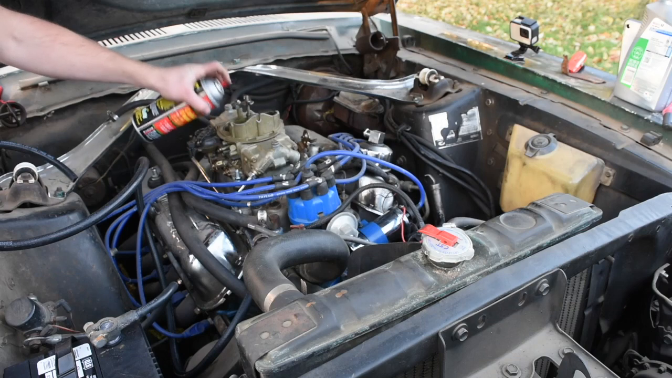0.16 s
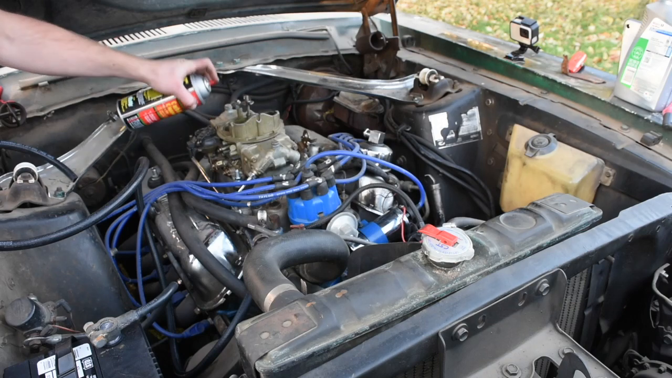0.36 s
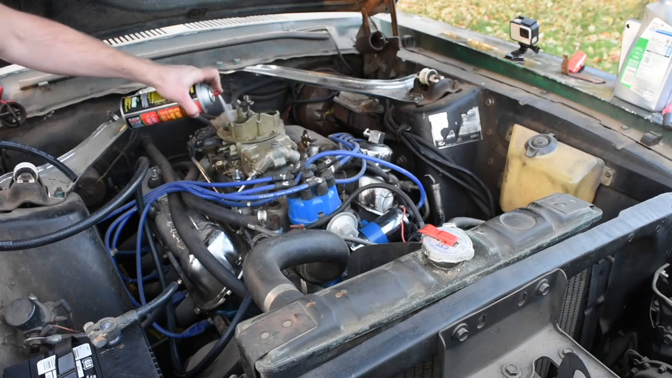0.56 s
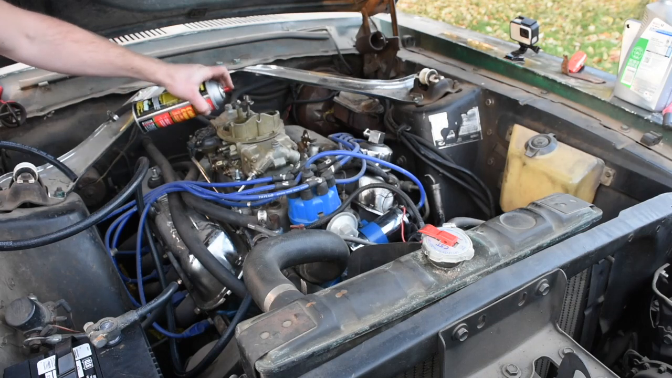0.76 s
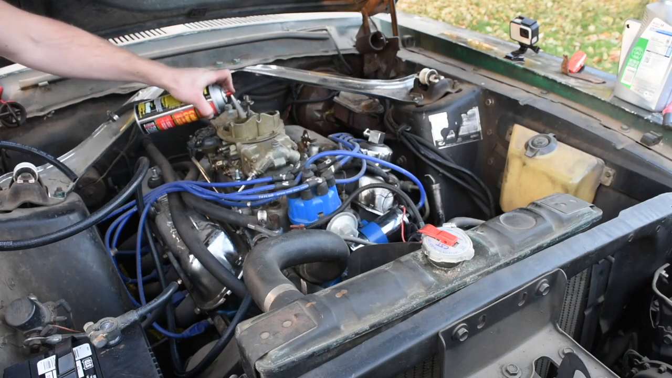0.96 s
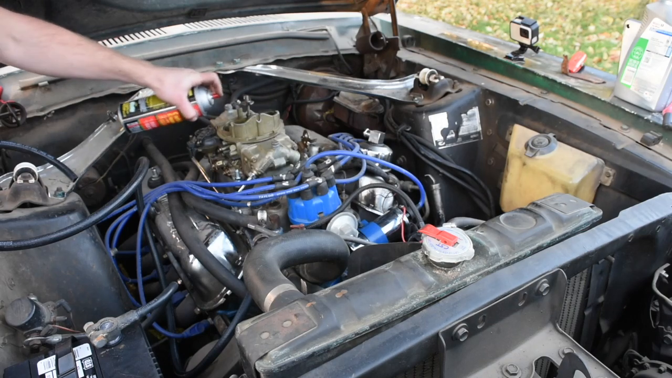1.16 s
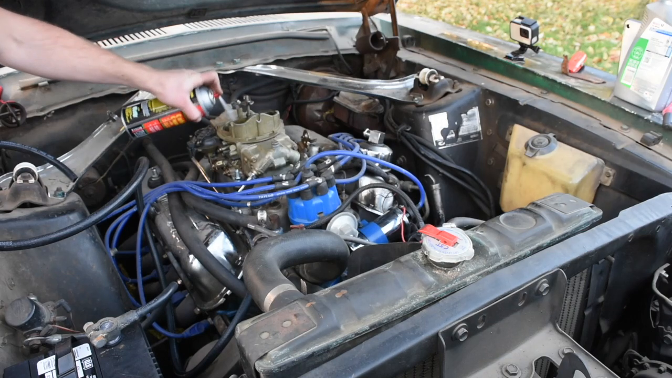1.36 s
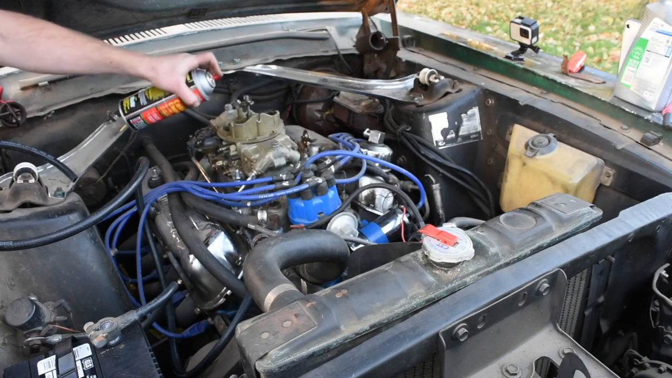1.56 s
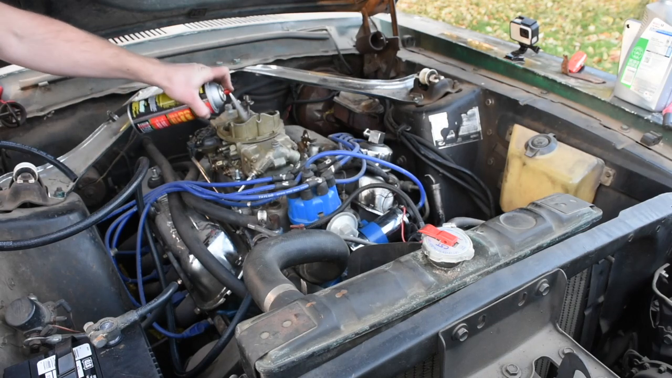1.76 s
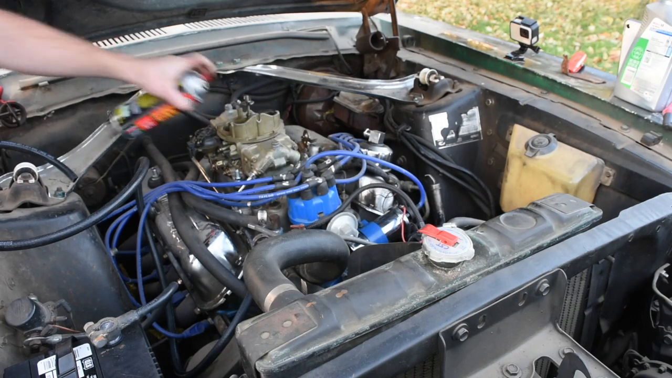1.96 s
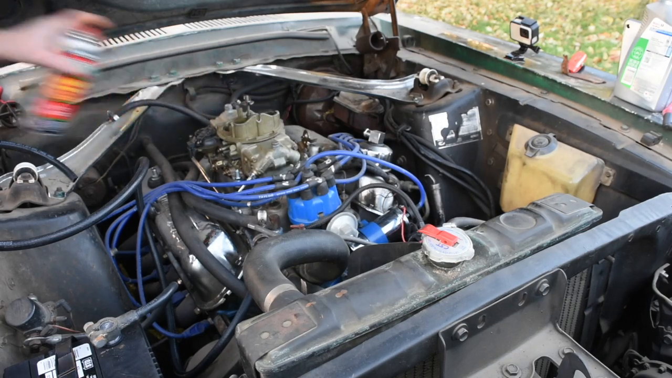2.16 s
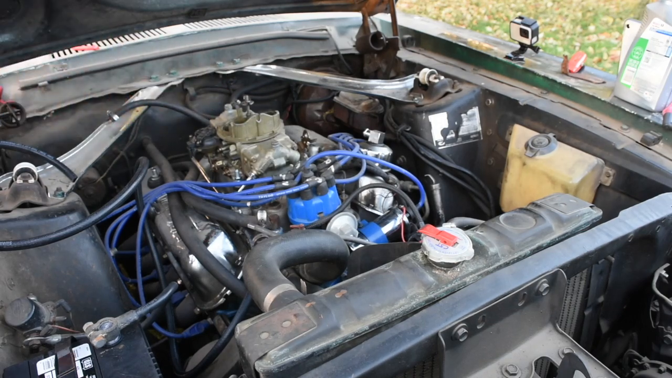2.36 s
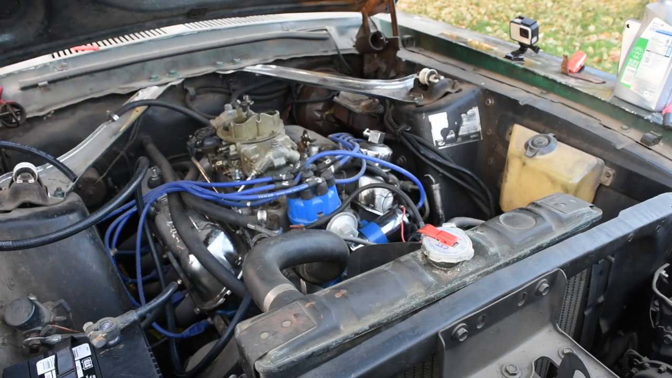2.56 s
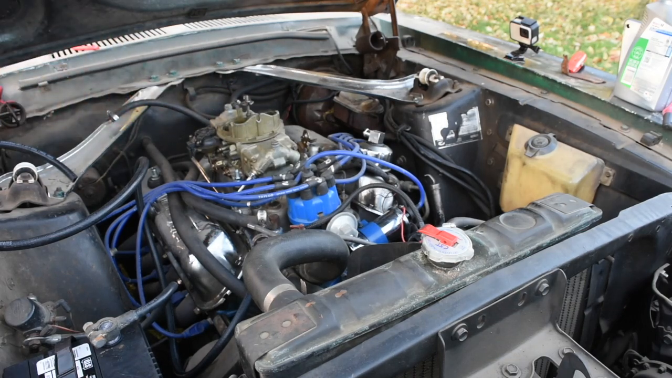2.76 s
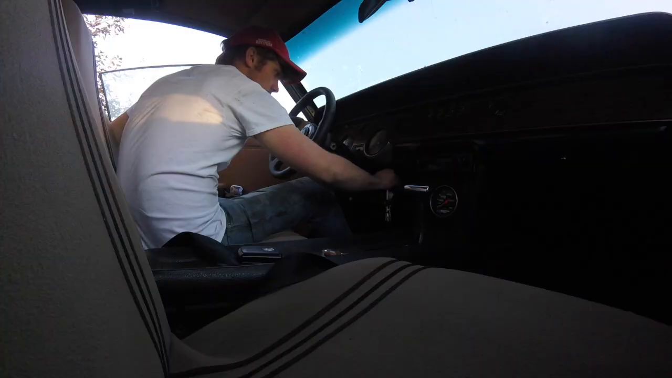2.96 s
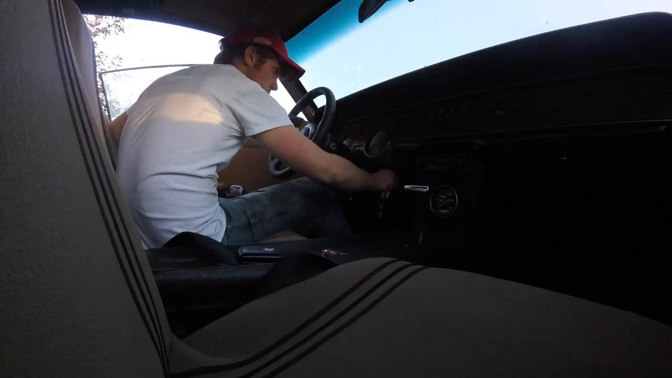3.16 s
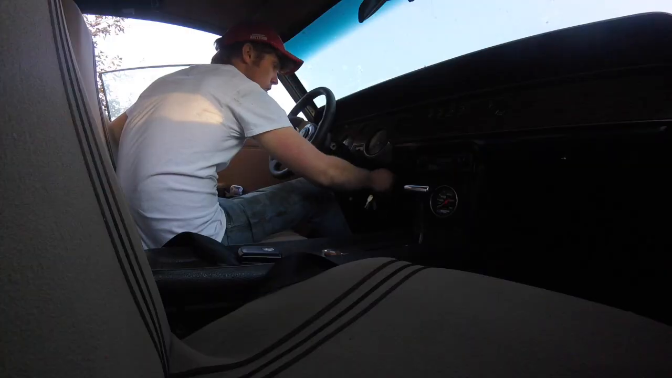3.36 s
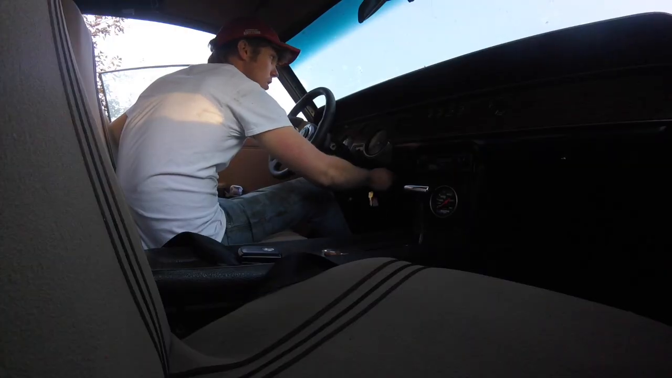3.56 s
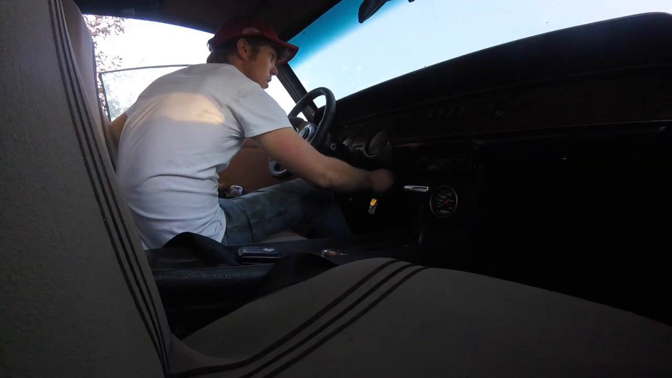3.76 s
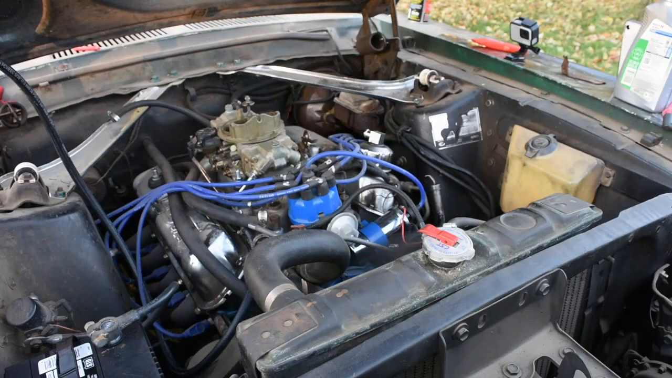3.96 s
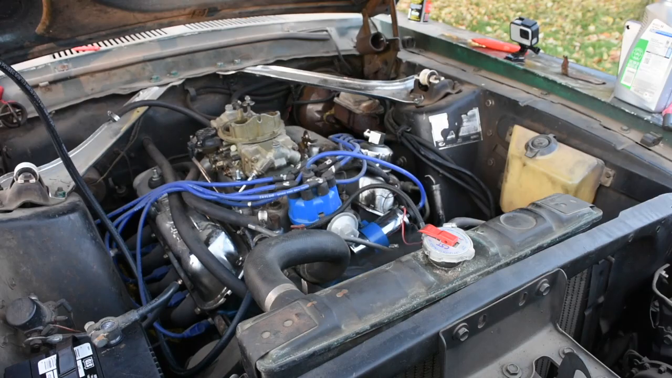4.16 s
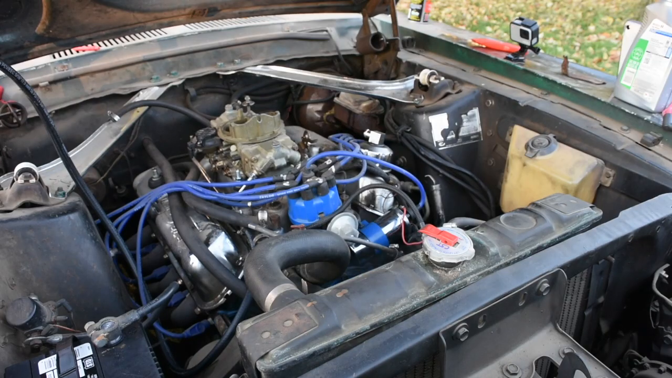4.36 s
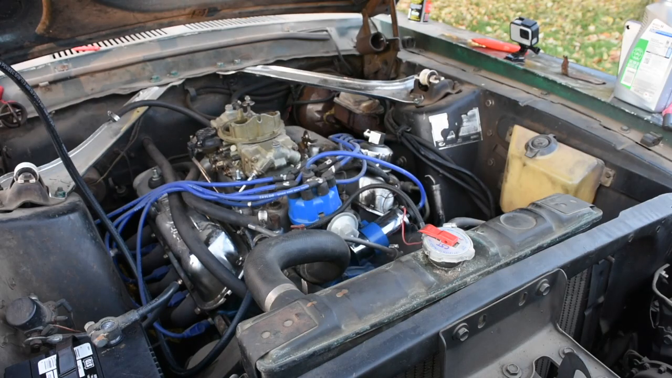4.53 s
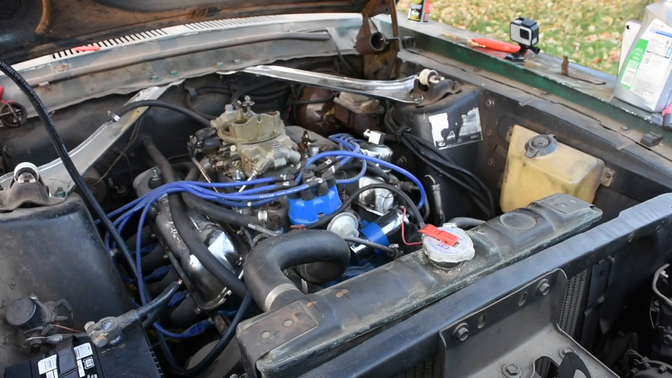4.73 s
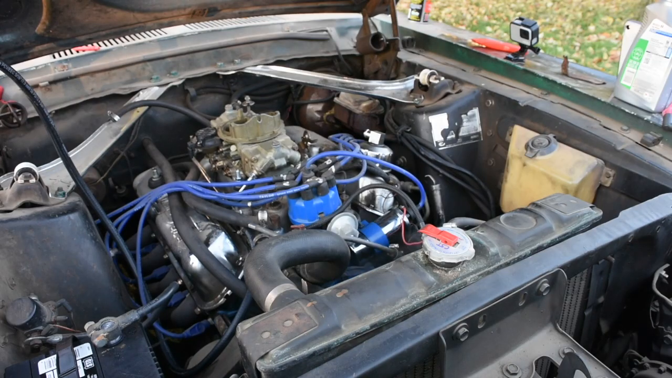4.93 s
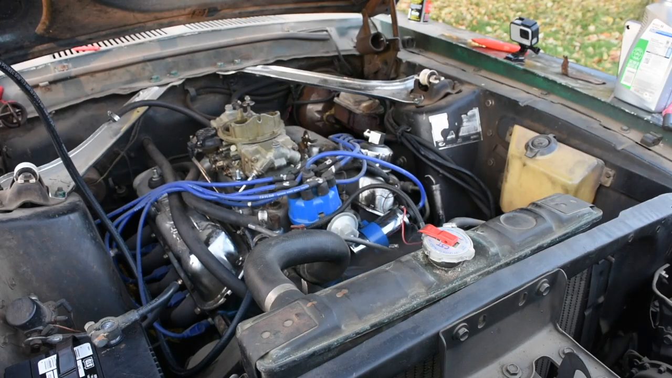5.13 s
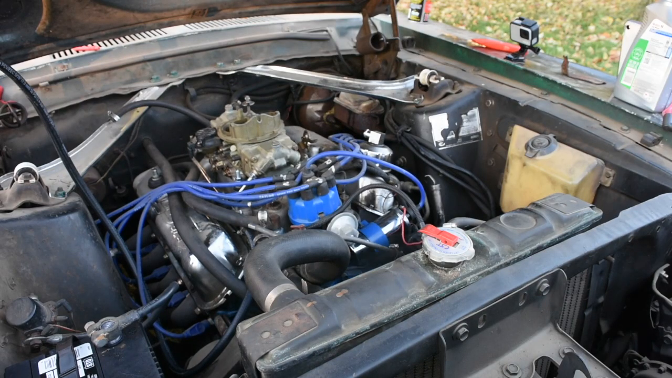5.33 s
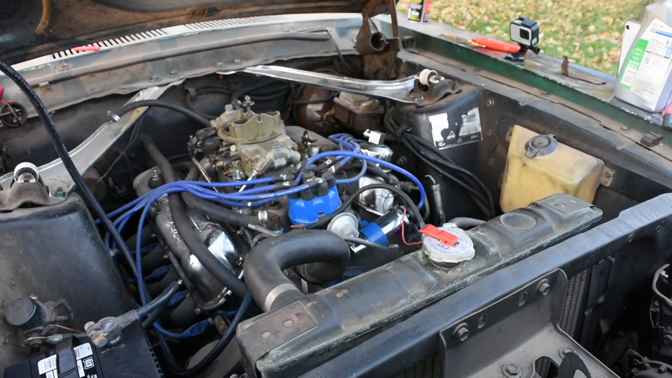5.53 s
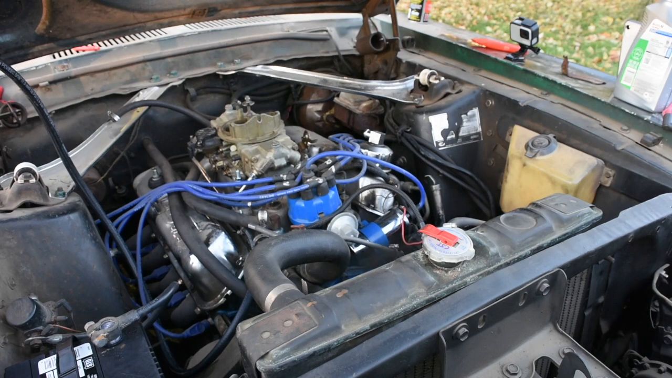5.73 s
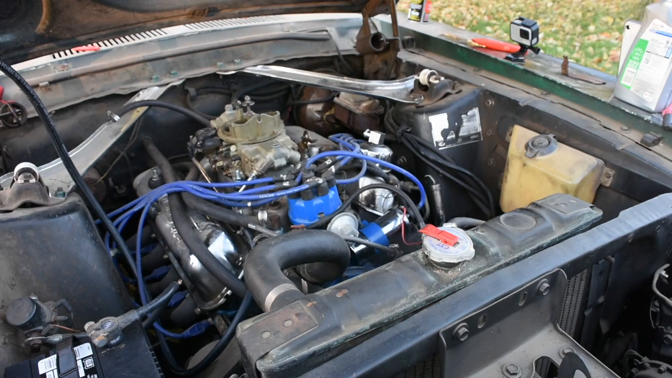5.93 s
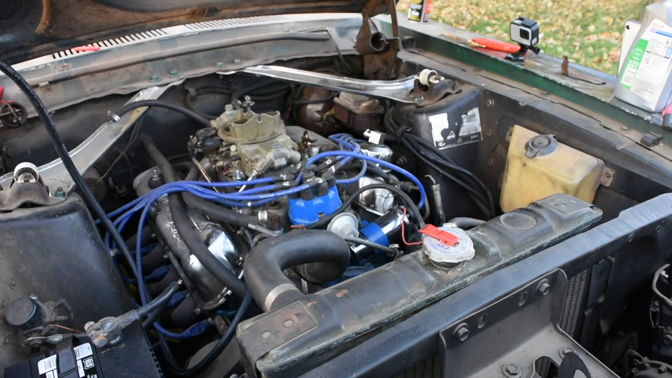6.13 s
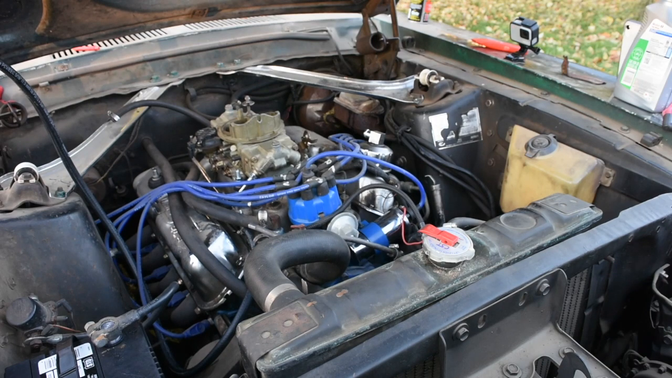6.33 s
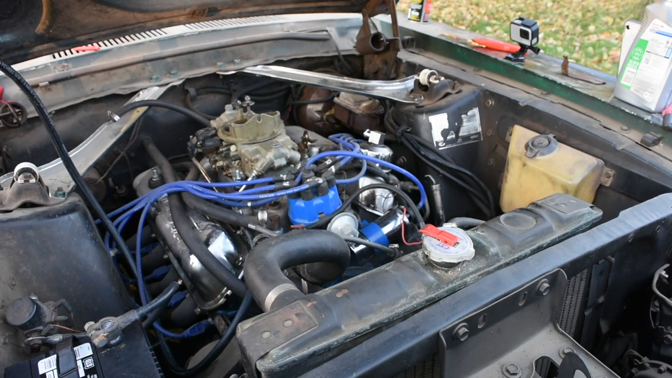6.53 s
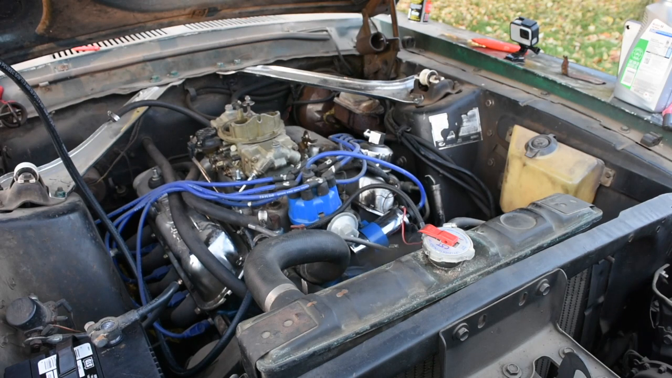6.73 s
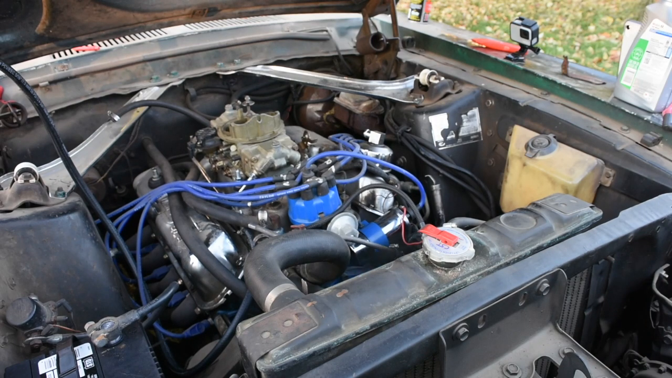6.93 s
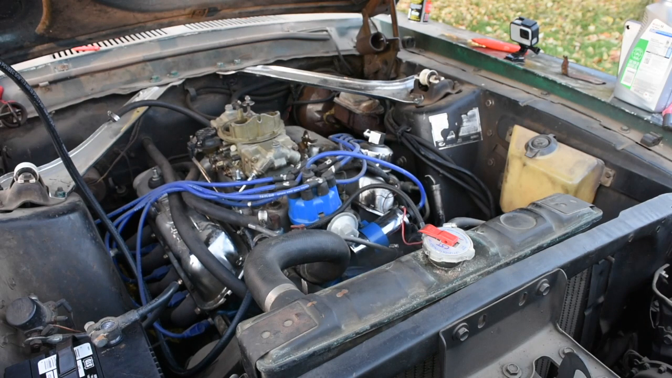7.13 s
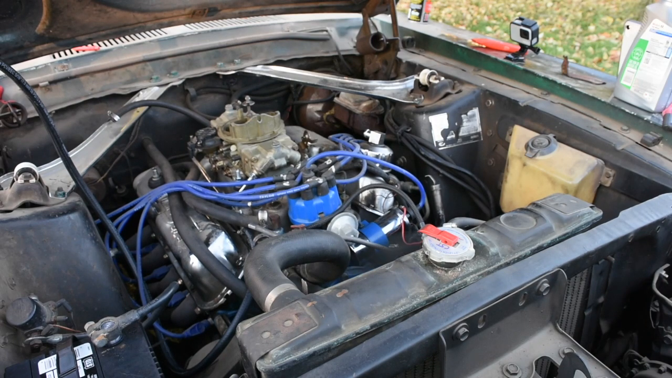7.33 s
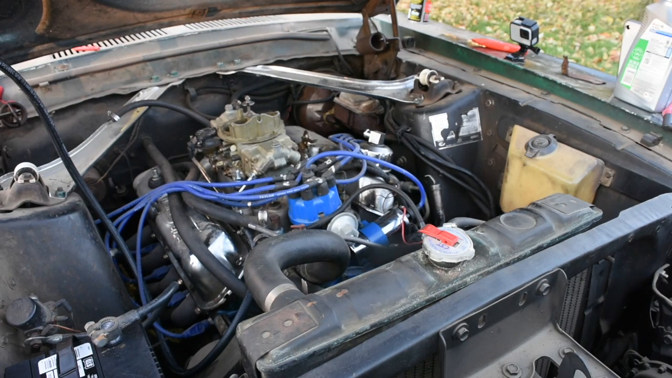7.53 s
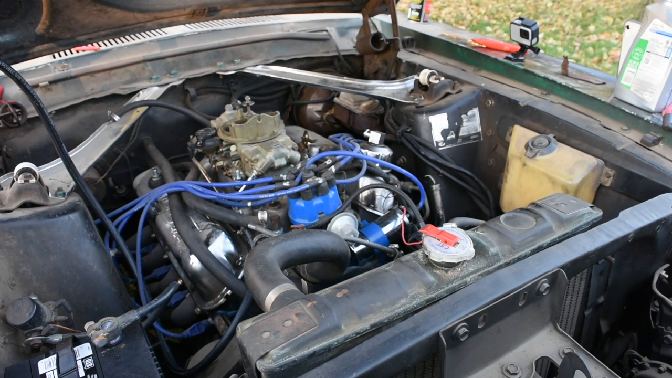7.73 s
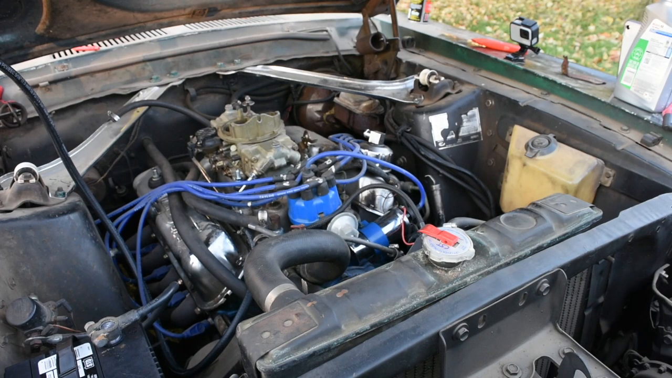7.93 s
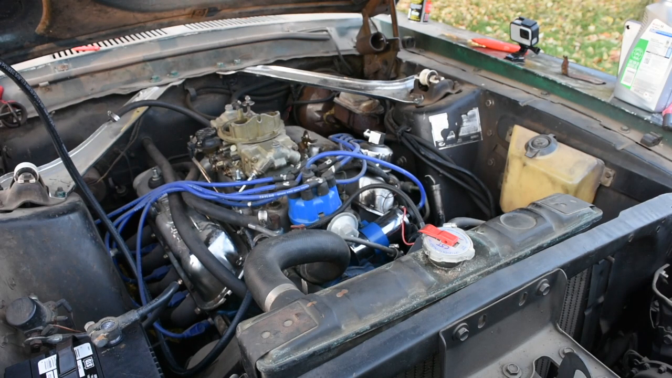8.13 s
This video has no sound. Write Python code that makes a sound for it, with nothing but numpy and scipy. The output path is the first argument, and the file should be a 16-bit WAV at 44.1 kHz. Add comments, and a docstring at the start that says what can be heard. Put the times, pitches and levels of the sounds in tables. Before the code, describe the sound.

Quiet outdoor yard noise sits underneath. From 0 to about 1.9 seconds, five short, bright aerosol squirts hiss close by, beginning near 0, 0.55, 0.95, 1.35 and 1.75, each opening sharply, with a slight sputter and a faint hollow hoot from the carburetor throat. Light taps ring the can between squirts and around 2.1 to 2.3. At 2.8 a car door slams with a low, boxy boom of panels and air, stopping abruptly near 2.95; a very weak hum follows. At 3.4 hard metallic clanks and a hollow thud engage the starter. It cranks loudly until 7.6, a gritty gear whine with grinding, rattle and deep body shake, surging roughly thirteen times a second with compression strokes, slightly tiring, never firing. It releases at 7.65, clunks at 7.7, coasts with thin high squeaks around 7.8, then clunks at 7.9 and clinks softly at 8.1.

```python
"""Over quiet yard noise, five squirts of a spray can hiss into a hooting carburettor throat; taps ring the can.
A door slams with a low boom of panels and air, and a weak hum follows. Then blows ring the iron and a starter
cranks a V8 that never catches: tooth tones, grind and rattle rise and fall with every compression stroke.
The starter lets go and coasts, thin whistles squeak as it runs down, and the last blows clunk and clink."""
import sys
import numpy as np
from scipy import signal
from scipy.fft import rfft, irfft, next_fast_len
from scipy.io import wavfile
from scipy.ndimage import uniform_filter1d, minimum_filter1d, map_coordinates

SR = 44100
rng = np.random.default_rng(int(sys.argv[2]) if len(sys.argv) > 2 else 0)


def store_pcm(level_fs):
    """Save levels as 16-bit WAV."""
    pcm = np.round(np.clip(level_fs, -1, 1) * 32767).astype(np.int16)
    wavfile.write(sys.argv[1], SR, np.atleast_2d(pcm).T)


def makeup_ratio(level_db):
    """Linear amplitude ratio for a level in decibels (20 dB per factor of ten)."""
    decades = np.asarray(level_db, float) / 20
    return 10 ** decades


N = 361179

# colour of the yard noise: pitch_hz, level_db
YARD_COLOUR = [(13, -39), (22, -10), (58, -3), (123, -3.5), (196, -15), (259, -15), (403, -19),
               (1700, -32.5), (2010, -32.5), (10300, -42), (15000, -48.5), (16500, -62.5)]
# loudness of the yard over time: time_s, level_db
YARD_LEVEL = [(0, -55), (2, -53), (2.4, -52.5), (2.9, -52.5), (3.3, -52.5), (7.9, -43), (8.19, -49)]
# faint hum in the cab: pitch_hz, level_db
HUM_TONES = [(258, -59), (1720, -78), (2170, -80)]
# the body shakes the microphone: time_s, level_db
SHUDDER_LEVEL = [(3.4, -37.5), (4, -39.5), (6, -42), (7.6, -45), (8.19, -68)]
# colour of that shaking: pitch_hz, level_db
SHUDDER_COLOUR = [(15, -26.5), (28, 1), (45, 1), (110, -1), (160, -40)]
# echoes of the engine bay: pitch_hz, level_db; then pitch_hz, time to fall 60 dB_s
BAY_COLOUR, BAY_FADE = [(100, -5), (16000, -6)], [(200, 1.0), (8000, 0.056)]

# door panels that ring: pitch_hz, level_db, time to fall 60 dB_s
DOOR_PANELS = [(106, 2, 0.34), (296, -21, 0.31), (880, -19, 0.35), (1100, -23, 0.2), (1240, -23, 0.17),
               (1660, -10, 0.14), (2230, -21, 0.19), (2385, -19, 0.16)]
# the air moved by the door: pitch_hz, level_db
DOOR_AIR_COLOUR = [(29, -24), (50, -1), (141, -6.5), (532, -17), (1210, -15), (2490, -20.5), (3030, -19),
                   (16000, -55)]
# how long that air sounds: pitch_hz, time to fall 60 dB_s
DOOR_AIR_FADE = [(100, 0.46), (1000, 0.22), (3000, 0.16), (10000, 0.046)]
DOOR_S, DOOR_END_S = 2.784, 2.942

# squirts: open_s, shut_s, jet_level_db, throat_hz, throat_level_db, seep before opening_s, jet_ring_hz
SQUIRTS = [(-.05, 0.2, -22.5, 804, -36.5, .01, 5290), (0.537, 0.723, -21.5, 908, -36, 0.0018, 4330),
           (0.937, 1.147, -22, 860, -36, 0.028, 4520), (1.366, 1.495, -21.5, 870, -35, 0.026, 4860),
           (1.764, 1.915, -22, 815, -38.5, 0.053, 4740)]
# colour of the jet: pitch_hz, level_db
JET_COLOUR = [(88, -59), (150, -21.5), (571, -12), (864, -11.5), (1440, -12), (4420, -6), (5930, -5.5),
              (14100, 1), (15600, -4), (16500, -36.5)]
# part of the jet that differs left to right: pitch_hz, level_db
JET_WIDTH = [(3000, -59), (7000, -25.5), (10000, -13.5), (15000, -9)]
# touches on the can: start_s, level_db, ring_hz
CAN_TAPS = [(0.4784, -56, 2350), (0.8046, -46, 3250), (2.077, -47, 4020), (2.1929, -42, 2070),
            (2.211, -54, 2300), (2.2856, -52, 2240), (2.304, -48, 2400)]

# dry bearing, whistles that arch up and down: highest_s, start_s, end_s, top_hz, droop_hz per s squared, level_db
SQUEAKS = [(7.838, 7.77, 7.91, 9900, 330000, -57), (7.845, 7.79, 7.9, 11950, 200000, -59),
           (7.815, 7.805, 7.9, 14050, 200000, -59)]

# resonances of starter housing, flywheel and block: pitch_hz, width_hz, level_db
IRON_MODES = [(170.4, 8.8, -13), (348.2, 4.5, -4), (467, 4.8, -8.5), (588.5, 90, -6), (765.5, 8.1, 1),
              (993, 11, 3.5), (910, 12, -21.5), (1112, 23, 1), (1293, 14, -6.5), (1386, 5.4, 0),
              (1514, 25, -2.5), (1638, 20, -4.5), (2100, 12, -18), (2106, 24, 3), (2643, 16.6, -7.5),
              (2785, 38.6, 3), (3145, 142, -6), (3384, 18, 3.5), (3583, 83, -2), (4223, 30.5, 4.5),
              (4590, 45, -3), (4770, 14, -5.5), (4924, 64, -1.5), (5460, 130, -2.5), (5750, 61, -10),
              (6540, 110, -0.5), (7110, 76, -8.5), (7630, 70, 2), (9020, 64, -23.5)]
# blows on the iron: start_s, level_db, time to fall 60 dB_s, brightness_db per octave, thud_level_db, clink_level_db
BLOWS = [(3.373, -23.5, 0.062, -2.5, -13.5, -45), (3.395, -9.5, 0.091, -5.5, -35, -25.5),
         (3.431, -17, 0.27, -4, -24, -45), (7.708, -23.5, 0.11, -4, -23, -47.5),
         (7.916, -18.5, 0.054, -4.5, -21.5, -46), (8.095, -37, 0.028, 0, -48, -27),
         (8.11, -38.5, 0.085, -6, -54, -26)]
# hollow thud of the solenoid: pitch_hz, level_db, time to fall 60 dB_s
SOLENOID_THUD = [(360, -12.5, 0.4), (478, -5, 0.38), (577, -2, .1), (662, 4.5, 0.17), (1050, -13, 0.076),
                 (1247, -6, 0.23)]
# clink of the pinion, the small driving gear: pitch_hz, level_db, time to fall 60 dB_s
PINION_CLINK = [(1190, -12, .15), (2202, -8, .12), (2859, -2, .045), (3200, -3, .05), (4490, -10, .05),
                (8129, -8, .03), (13180, -10, .03)]

# starter engaging, running and coasting: time_s, grind_level_db, rattle_level_db while the pinion is free
STARTER_LEVELS = [(3.385, -18.5, -32), (3.4, -5.5, -13), (3.43, -13, -32), (3.46, -26.5, -54),
                  (3.52, -10.5, -42), (3.6, -20.5, -40), (3.63, -14, -40), (7.6, -16, -40),
                  (7.64, -22, -31), (7.66, -32, -55), (7.705, -19, -78), (7.74, -51.5, -57),
                  (7.78, -63, -68), (7.81, -42, -68), (7.87, -42, -68), (7.91, -48, -69)]
# colour of the grind: pitch_hz, level_db
GRIND_COLOUR = [(100, -23.5), (300, -15.5), (800, -10.5), (1300, -1.5), (2200, -2.5), (3200, -1),
                (5000, -2), (7500, -8.5), (9500, -19), (15500, -22), (16300, -50)]
# colour of the rattle: pitch_hz, level_db
RATTLE_COLOUR = [(3000, -29), (6000, 1), (9500, 3), (11500, -6.5), (15500, -14), (16300, -44.5)]
# colour of the motor drone: pitch_hz, level_db
DRONE_COLOUR = [(60, -10.5), (180, 3), (280, 1), (470, 2), (620, -3.5), (780, -4), (1300, -46.0)]
# one tooth contact: pitch_hz, level_db
TOOTH_CONTACT = [(350, -21.5), (520, -18.5), (1000, -15.5), (1300, -13.5), (1550, -7.5), (1720, -8),
                 (1950, -17.5), (2350, -16.5), (2800, -13), (3600, -21), (4200, -11), (5500, -24.5)]
# the engine's lean in the stereo field: pitch_hz, left minus right_db
ENGINE_LEAN = [(60, -1.5), (380, -1.5), (700, -1), (2400, -1.1), (4400, -.1), (8100, -.6), (15000, -1)]
# compression strokes at full speed: slowest_s into the cycle, slow_tooth_rate_hz, rise to fastest_s,
# fast_tooth_rate_hz, rattle_level_db
CYLINDERS = [(0, 455.2, .041, 523.4, -27.5), (.084, 491.1, .04, 541.5, -25),
             (.156, 499.9, 0.0382, 547.9, -24.5), (.228, 498.5, .043, 553, -24.5),
             (.307, 517.8, .039, 572.3, -23.5), (.378, 551, .021, 563, -27.5),
             (.454, 471, .037, 528.4, -25.5), (.523, 505.3, .034, 531.6, -28.5)]
# the drive winds up and swings back: time_s, tooth_rate_hz
FIRST_SWING = [(3.46, 450), (3.49, 500), (3.536, 559.5), (3.58, 498), (3.612, 441.4), (3.635, 497.6)]

# two crank turns at full speed; a moment when the first cylinder is slowest
CYCLE_S, CYCLE_STARTS_S = .6045, 5.718
SAG_PER_S = .0033  # the battery tires: share of full speed lost a second
# teeth engage; share of speed missing then, and how slowly that dies away
MESH_S, LAG, RUN_UP_S = 3.483, .3, .15
# current cut, teeth part; share of speed lost a second, for the first 0.04 s
KEY_OFF_S, UNMESH_S, BRAKE_PER_S = 7.58, 7.645, 4
# lost per whole share of missing speed: rattle, grind treble, high tooth tones
QUIET_START_DB, DULL_START_DB, SHRILL_START_DB = 78.5, 26, 23


def unit(x):
    """Scale a sound to an average (rms) strength of 1."""
    return x / np.sqrt(np.mean(x ** 2) + 1e-20)


def along(points, hz):
    """Read a curve of (Hz, value) points, with pitch on a log axis."""
    f, v = np.transpose(points)
    return np.interp(np.log(hz + 1), np.log(f + 1), v)


def curves(rows, **ends):
    """Draw each column after the time as a curve with one value per sample."""
    s, *cols = np.transpose(rows)
    return [np.interp(np.arange(N) / SR, s, c, **ends) for c in cols]


def wobble(rate):
    """A smooth random curve with this many random points a second."""
    knots = rng.standard_normal(int(N * rate / SR) + 4)
    return map_coordinates(knots, [np.arange(N) * rate / SR])


def filtered(x, response):
    """Multiply the spectrum of a sound by a response that depends on pitch."""
    m = next_fast_len(x.shape[-1] + SR // 2)
    spectrum = rfft(x, m) * response(np.fft.rfftfreq(m, 1 / SR))
    return irfft(spectrum, m)[..., :x.shape[-1]]


def noise(colour):
    """Steady noise of rms 1, with each pitch as strong as the colour says."""
    return unit(filtered(rng.standard_normal(N), lambda hz: makeup_ratio(along(colour, hz))))


def ring(modes, t):
    """Struck parts ring as fading sines, each at a slightly random strength."""
    out = 0
    for hz, db, t60 in modes:
        fade = makeup_ratio(db + rng.normal(0, 2) - 60 * t / t60)
        out = out + fade * np.sin(2 * np.pi * hz * t)
    return out


def dying(colour, t60s):
    """A half-second burst of noise whose pitches each fade at their own speed; peak 1."""
    hz, t, z = signal.stft(rng.standard_normal(SR // 2), SR, nperseg=256)
    z = z * makeup_ratio(along(colour, hz)[:, None] - 60 * t / along(t60s, hz)[:, None])
    burst = signal.istft(z, SR, nperseg=256)[1][:SR // 2]
    return burst / np.abs(burst).max()


def iron(hz, between_db):
    """The casting answers strongly at its resonances, over a flat level in between."""
    out = makeup_ratio(between_db)
    for k, (centre, width, db) in enumerate(IRON_MODES):
        damping = 1j * hz * width
        out = out + (-1) ** k * makeup_ratio(db) * damping / (centre * centre - hz * hz + damping)
    return out


def yard():
    """Background noise, first alike on both sides and then the part that differs, slowly swelling."""
    level = makeup_ratio(curves(YARD_LEVEL)[0] + 1.5 * wobble(5.1))
    return level * noise(YARD_COLOUR), makeup_ratio(-13.5) * level * noise(YARD_COLOUR)


def bay(x):
    """The open engine bay smears a sound with short echoes, the treble dying sooner."""
    echoes = unit(dying(BAY_COLOUR, BAY_FADE)) / np.sqrt(SR // 2)
    return signal.fftconvolve(x, echoes)[:N]


def hum():
    """Weak, slightly unsteady tones between the slam and the start."""
    t, tones = np.arange(N) / SR, np.zeros(N)
    for hz, db in HUM_TONES:
        level = makeup_ratio(db + 1.5 + 2.2 * wobble(24))
        tones += level * np.sin(2 * np.pi * hz * t + 1.1 * wobble(15))
    return tones * (t > DOOR_END_S) * (t < BLOWS[0][0])


def shudder():
    """The body shakes the microphone: a deep rumble of unsteady strength."""
    level_db = curves(SHUDDER_LEVEL, left=-200)[0] + 2.5 * wobble(5)
    return makeup_ratio(level_db) * noise(SHUDDER_COLOUR)


def door():
    """A low boom of ringing panels and cab air that stops short."""
    t, out = np.arange(round((DOOR_END_S - DOOR_S) * SR)) / SR, np.zeros(N)
    panels = makeup_ratio(-20.0) * ring(DOOR_PANELS, t)
    air = makeup_ratio(-12.0) * dying(DOOR_AIR_COLOUR, DOOR_AIR_FADE)[:len(t)]
    out[round(DOOR_S * SR):][:len(t)] = (panels + air) * (1 - np.exp(-t / 0.0015))
    return filtered(out, lambda hz: (1j * hz / (1j * hz + 60)) ** 2)  # less below 60 Hz


def spray():
    """The jet hisses and sputters, nearby metal combs it anew each squirt, and the throat hoots like a bottle."""
    mid, side, t = np.zeros(N), np.zeros(N), np.arange(N) / SR
    hiss = noise(JET_COLOUR)
    wide = filtered(noise(JET_COLOUR), lambda hz: makeup_ratio(along(JET_WIDTH, hz)))
    for opens, shuts, jet_db, throat_hz, throat_db, seep, ring_hz in SQUIRTS:
        # a seep, a fast opening, a fast closing, then a fading dribble
        flow_s = [opens - seep - .01, opens - seep, opens - .002, opens + 0.003, opens + 0.0139,
                  shuts, shuts + 0.023, shuts + .11, shuts + .2]
        flow = makeup_ratio(np.interp(t, flow_s, [-88, -42.5, -27.0, -3.5, 0.0, 0.0, -29.5, -50.5, -78]))
        delay_s, gain = rng.uniform(.0004, .005, 8), .23 * rng.standard_normal(8)

        def metal_and_nozzle(hz):
            """Eight echoes comb the hiss; the jet adds a faint ring 130 Hz wide."""
            comb = 1 + np.exp(-2j * np.pi * hz[:, None] * delay_s) @ gain
            return comb * (1 + makeup_ratio(2) / (1 + (2 * (hz - ring_hz) / 130) ** 2))

        level = flow * makeup_ratio(jet_db + 1.07 * wobble(60.38) + 0.43 * wobble(900))
        mid += level * unit(filtered(hiss, metal_and_nozzle))
        side += level * wide
        hoot = (1 + wobble(90)) * np.cos(2 * np.pi * throat_hz * t + 1.1 * wobble(160))
        mid += flow ** 1.5 * makeup_ratio(throat_db - 1.0) * unit(hoot)
    t = t[:SR // 10]
    for s, db, hz in CAN_TAPS:
        click = makeup_ratio(-6 - 60 * t / .05) * rng.standard_normal(len(t))
        mid[round(s * SR):][:len(t)] += makeup_ratio(db - 5.5) * (ring([(hz, -3, .06)], t) + click)
    return np.array([mid + side, mid - side])


def squeak():
    """The dry bearing whistles thin and high, with shaky pitch, while the armature runs down."""
    t, out = np.arange(N) / SR, np.zeros(N)
    for top, start, end, top_hz, droop, db in SQUEAKS:
        hz = top_hz - droop * (np.clip(t, start, end) - top) ** 2
        phase = 2 * np.pi * np.cumsum(hz * (1 + .008 * wobble(300))) / SR
        fade = np.interp(t, [start, start + 0.014, end - .02, end], [0, 1, 1, 0])
        out += fade * makeup_ratio(db + 5 + 4 * wobble(150)) * np.sin(phase)
    return out


def blows():
    """Solenoid and pinion strike: a short noise burst rings the iron, with a hollow thud and a clink."""
    burst, out, t = np.zeros(N + SR), np.zeros(N + SR), np.arange(SR // 3) / SR
    for s, db, length, tilt_db, thud_db, clink_db in BLOWS:
        def brightness(hz):
            """Tilt the treble and thin out what lies below 180 Hz."""
            return makeup_ratio(tilt_db * np.log2((hz + 200) / 2000)) * hz ** 2 / (hz ** 2 + 180 ** 2)

        hit = rng.standard_normal(len(t)) * makeup_ratio(-60 * t / length) * (1 - np.exp(-t / 0.0022))
        burst[round(s * SR):][:len(t)] += makeup_ratio(db) * filtered(hit, brightness)
        thud = makeup_ratio(thud_db) * ring(SOLENOID_THUD, t) * (1 - np.exp(-t / 0.0017))
        clink = makeup_ratio(clink_db) * ring(PINION_CLINK, t)
        out[round(s * SR):][:len(t)] += thud + clink
    crack = makeup_ratio(17.5) * filtered(burst, lambda hz: iron(hz, between_db=-3.5))
    return (out + crack)[:N]


def starter():
    """Tooth tones and grind ring the iron; slowing loads the teeth, speeding lets them rattle."""
    slowest_s, slow_hz, rise_s, fast_hz, peak_db = np.transpose(CYLINDERS)
    t = np.arange(N) / SR

    # share of full speed, and how far the engine has turned
    lag = LAG * np.exp(-np.maximum(t - MESH_S, 0) / RUN_UP_S)
    speed = 1 - lag - SAG_PER_S * (t - CYCLE_STARTS_S) - BRAKE_PER_S * np.clip(t - KEY_OFF_S, 0, .04)
    turned = np.cumsum(speed) / SR
    turned = turned - turned[round(CYCLE_STARTS_S * SR)]

    def cyclic(s, v):
        """Repeat a curve every engine cycle."""
        return np.interp(turned, np.ravel(s), np.ravel(v), period=CYCLE_S)

    # tooth rate in Hz, dipping at each compression stroke
    rate = speed * cyclic([slowest_s, slowest_s + rise_s], [slow_hz, fast_hz])
    rate = np.where(t < FIRST_SWING[-1][0], curves(FIRST_SWING)[0], rate)
    rate = uniform_filter1d(rate, size=300)
    rate = rate + .2 * (rate - uniform_filter1d(rate, size=3300))  # the springy drive overshoots each swing
    speeding = np.gradient(np.log(rate)) * SR
    speeding = np.clip(uniform_filter1d(speeding, size=400), -3, 4)
    load_db = -1.1 * speeding
    phase = 2 * np.pi * np.cumsum(rate * (1 + 0.00599 * wobble(150))) / SR

    on = (t > STARTER_LEVELS[0][0]) & (t < STARTER_LEVELS[-1][0])
    grind_db, free_rattle_db = curves(STARTER_LEVELS)
    meshed = np.interp(t, [MESH_S - .02, MESH_S, KEY_OFF_S, UNMESH_S], [0, 1, 1, 0])

    # seven tooth tones; each swells as it crosses a resonance
    hz = np.arange(6000.)
    swell = makeup_ratio(along(TOOTH_CONTACT, hz)) * np.abs(iron(hz, between_db=-5.5))
    teeth = np.zeros(N)
    for k in np.arange(7) + 1:
        level = np.interp(k * rate, hz, swell) * makeup_ratio((1.2 if k == 3 else 2.5) * wobble(60))
        teeth += level * np.sin(k * phase + rng.uniform(0, 2 * np.pi))
    low = filtered(teeth, lambda hz: hz < 2450)
    # high tones are heard through the ringing modes
    high = filtered(teeth, lambda hz: (hz >= 2450) * makeup_ratio(6.5) * iron(hz, between_db=-6))

    # the grind comes in tooth-long bursts, duller while speed is missing
    gate = 1 + .5 * np.cos(phase)
    rough = unit(filtered(noise(GRIND_COLOUR) * gate, lambda hz: iron(hz, between_db=-10)))
    treble = filtered(rough, lambda hz: 1 / (1 + (4900 / (hz + 1)) ** 8))  # above about 4900 Hz
    rough = rough - (1 - makeup_ratio(-DULL_START_DB * lag)) * treble

    # the motor drone is louder around the first load and falls when coasting
    drone = unit(filtered(noise(DRONE_COLOUR), lambda hz: iron(hz, between_db=-20.5)))
    inrush_db = 14.5 * np.exp(-np.abs(t - 3.46) / 0.074)
    drone_db = -26.5 + inrush_db - 50.5 * np.maximum(t - KEY_OFF_S, 0)

    # the slack is widest late in each rise; no two strokes rattle alike
    middle = slowest_s + .75 * rise_s
    valley = (middle + np.r_[middle[-1] - CYCLE_S, middle[:-1]]) / 2
    surge_db = cyclic([middle, valley], [peak_db, peak_db - 14]) + 1.5 * wobble(16)
    usual_db = surge_db.mean()
    slack_db = meshed * (uniform_filter1d(surge_db, size=600) - usual_db)
    meshed_rattle = meshed * makeup_ratio(slack_db + usual_db - QUIET_START_DB * lag + 5.5)
    rattle = meshed_rattle + (1 - meshed) * makeup_ratio(free_rattle_db)
    flutter = gate * makeup_ratio(0.84 * wobble(700))
    loose = unit(filtered(noise(RATTLE_COLOUR) * flutter, lambda hz: iron(hz, between_db=-4)))

    # high tones and grind follow a small part of the rattle's swells
    high_db = 0.13 * slack_db + 1.0 * wobble(140) - SHRILL_START_DB * lag
    tones = meshed * makeup_ratio(grind_db + 13.5) * (makeup_ratio(load_db) * low + makeup_ratio(high_db) * high)
    grind = makeup_ratio(grind_db + 2 + 0.1 * slack_db + 1.0 * wobble(30)) * rough
    return tones + on * (grind + makeup_ratio(drone_db + 0.83 * wobble(9)) * drone + rattle * loose)


def scene():
    """All sources, a little right of centre, over the noise of the yard."""
    yard_mid, yard_apart = yard()
    engine, jet = starter() + blows() + squeak(), spray()
    engine = engine + makeup_ratio(-20) * bay(engine) + shudder()

    def lean(hz):
        """Treble reaches the two sides slightly out of step, and each pitch leans in level."""
        level = makeup_ratio(np.outer([.5, -.5], along(ENGINE_LEAN, hz)))
        return level * np.exp(np.outer([.5j, -.5j], 0.82 * (hz / 12000) ** 3))

    engine = filtered(engine, lean)
    mono = makeup_ratio(-28.5) * bay(jet[0]) + door() + hum() + yard_mid
    return engine + (mono + jet) * makeup_ratio([[-.6], [.6]]) + [yard_apart, -yard_apart]


def roll_off(x):
    """The treble ends steeply here."""
    return signal.sosfilt(signal.butter(12, 17000, fs=SR, output="sos"), x)


def record(dry):
    """The microphone amplifier rounds peaks, a limiter turns loud moments down, and the top treble is cut."""
    rounded = dry / (1 + np.abs(dry / 1.238) ** 4) ** (1 / 4)  # bends towards a ceiling of 1.238
    need = np.minimum(1, .6 / (np.abs(rounded).max(0) + 1e-9))
    gain = uniform_filter1d(minimum_filter1d(need, size=441), size=221)
    mix = filtered(rounded * gain, lambda hz: 1 / (1 + (hz / 15800) ** 200))
    return roll_off(mix)


dry = scene()
out = record(dry)
store_pcm(out)
```